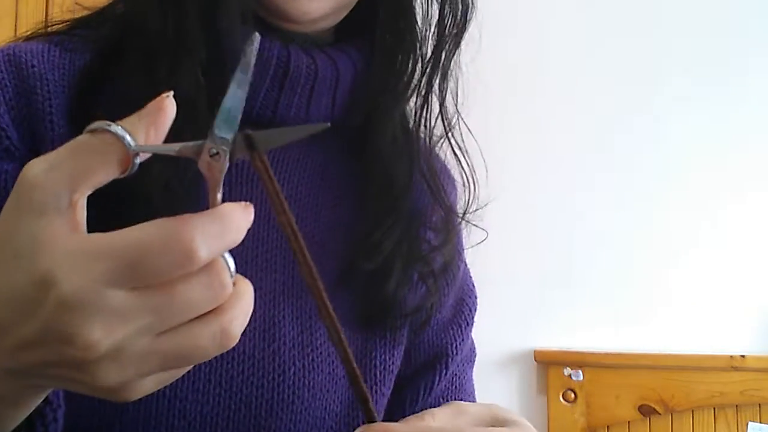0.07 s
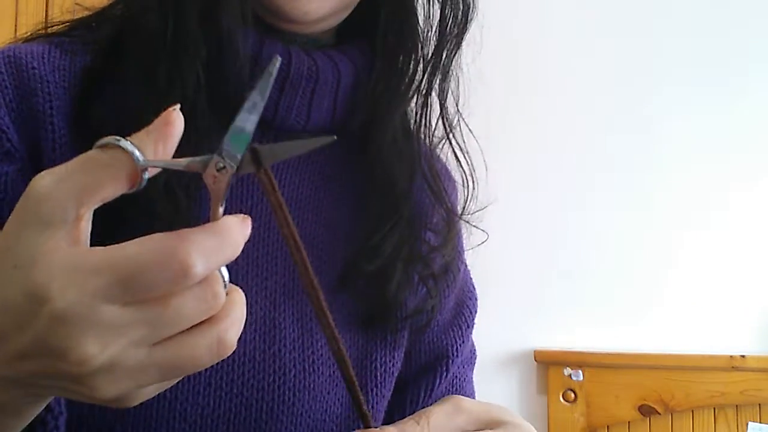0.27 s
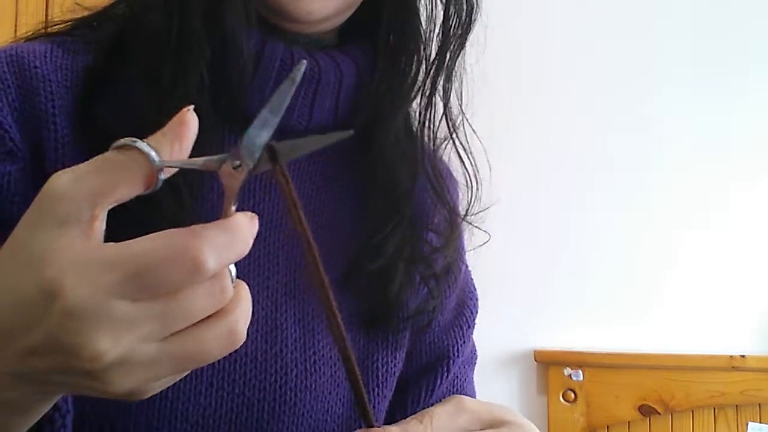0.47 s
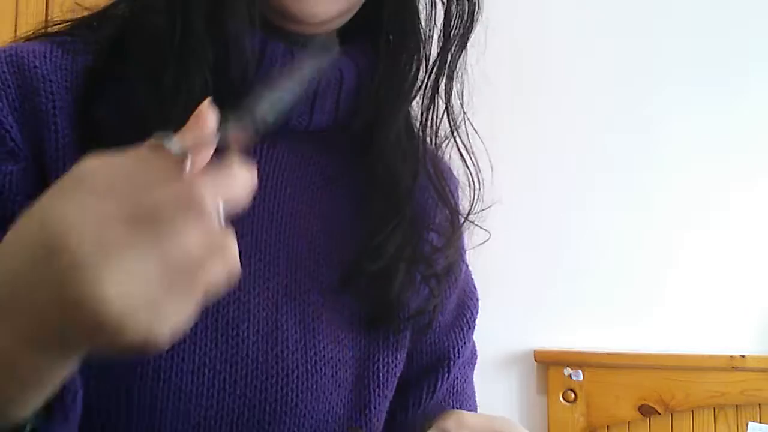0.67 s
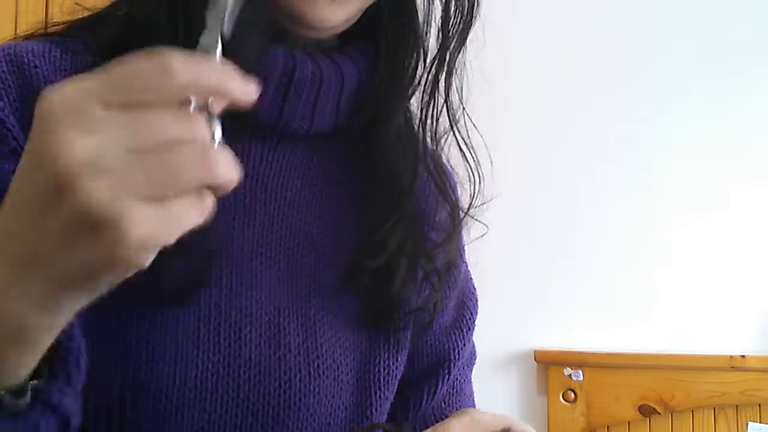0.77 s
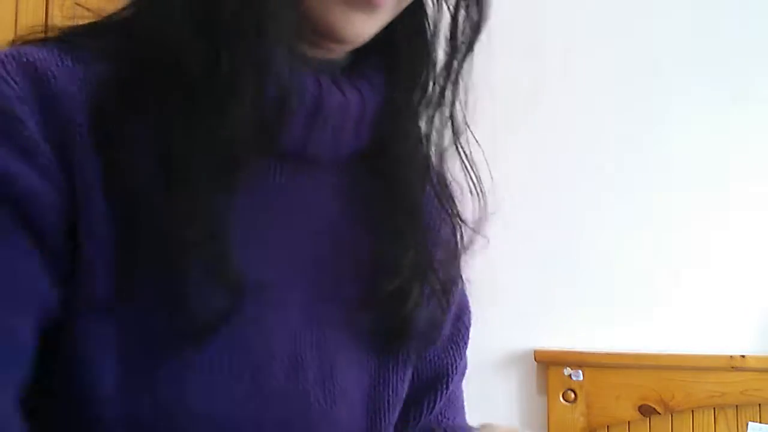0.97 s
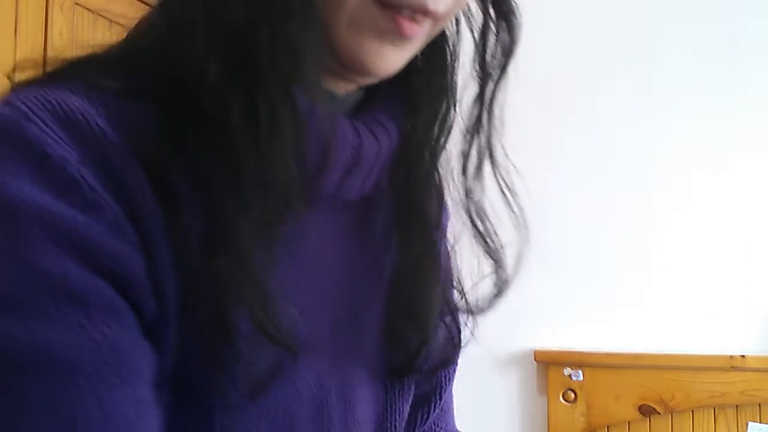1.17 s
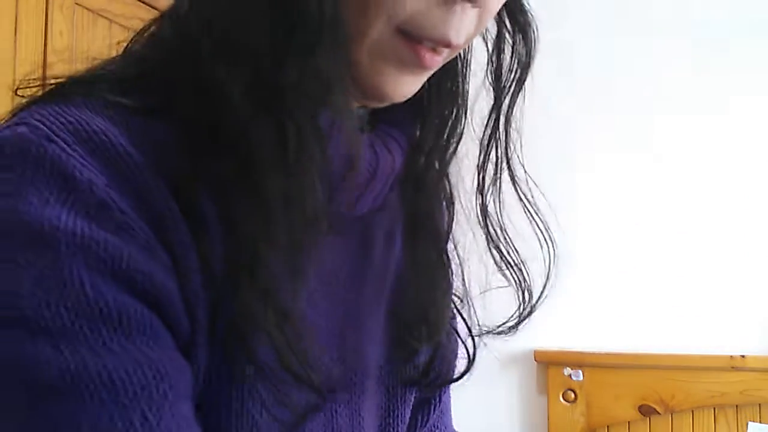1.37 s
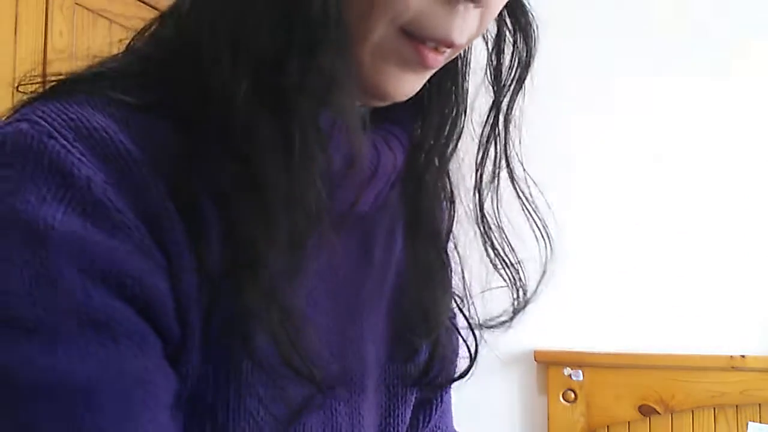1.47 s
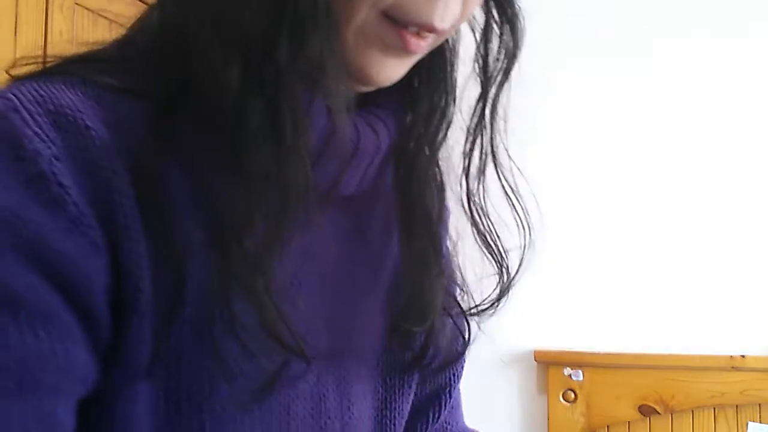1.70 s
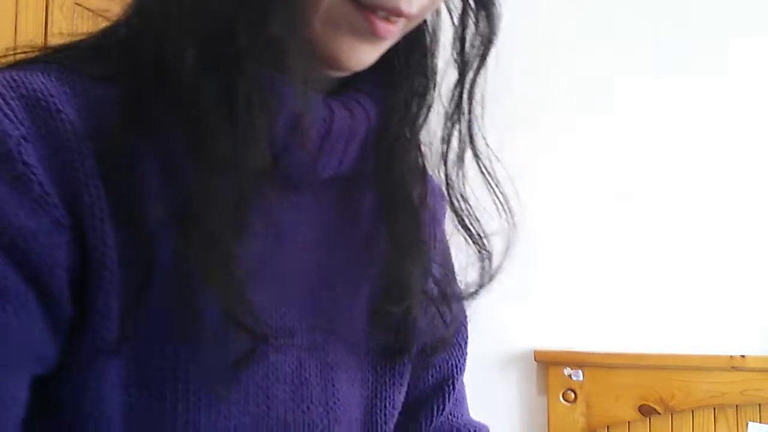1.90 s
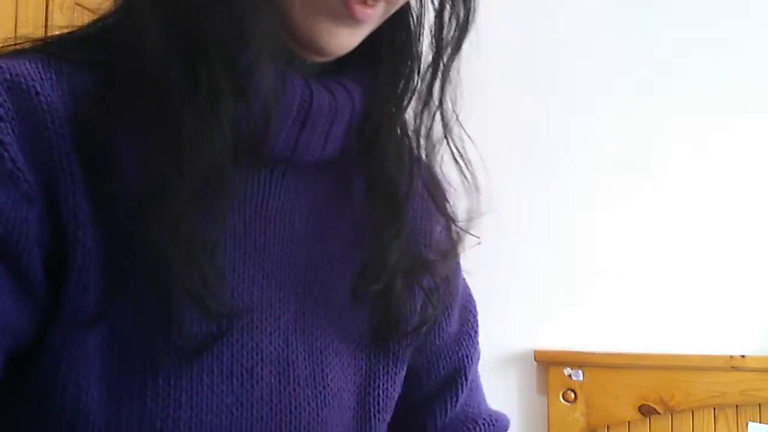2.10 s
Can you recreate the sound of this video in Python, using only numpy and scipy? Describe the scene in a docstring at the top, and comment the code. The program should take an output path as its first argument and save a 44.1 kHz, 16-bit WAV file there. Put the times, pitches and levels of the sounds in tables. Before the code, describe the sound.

Small steel scissors cut yarn close to the microphone: faint blade rubs and light metal ticks, one sharper click, then a loud crisp snip with a short bright ring, in a quiet small room with soft hiss.

```python
"""Small steel scissors cut a strand of yarn close to the microphone in a quiet room.
Over a low rumble and a steady hiss, the blades first rub faintly (swells of grainy noise bands) and
tick as they are handled (short noise bursts with a room tail), with one sharper click among the ticks.
Then they snap through the yarn (coloured noise crack); 6.5 ms later the handles clack together
(grainy rattle) and the steel rings briefly (decaying sines). Soft low bumps come before and after."""
import sys
import numpy as np
from scipy.fft import rfft, irfft, next_fast_len
from scipy.io import wavfile
from scipy.ndimage import map_coordinates

SR = 44100
rng = np.random.default_rng(int(sys.argv[2]) if len(sys.argv) > 2 else 0)


def output_pcm(signal):
    """Save a mono or channel-first signal as 16-bit PCM at the path in sys.argv[1].

    Samples are clipped to [-1, 1] before scaling.
    """
    pcm = np.clip(np.atleast_2d(signal).T, -1, 1) * 32767
    wavfile.write(sys.argv[1], SR, np.round(pcm).astype(np.int16))


N = 94682
TIME = np.arange(N) / SR
SNAP_S, CLACK_S = 1.4396, 1.4461  # the blades snap, then the handles clack
ROOM_T60_S, ROOM_RISE_S = 0.18, 0.0032  # the room's answer to ticks and click; the clack shares the rise


def amp(db):
    """Decibels to gain."""
    return 10 ** (np.asarray(db) / 20)


def unit(x):
    """Scale to rms 1."""
    return x / np.sqrt(np.mean(x ** 2) + 1e-20)


def filtered(x, gain):
    """Multiply the spectrum of x by a gain that depends on frequency."""
    padded = next_fast_len(N + SR // 4)
    hz = np.fft.rfftfreq(padded, 1 / SR)
    return irfft(rfft(x, padded) * gain(hz), padded)[:N]


def noise(points):
    """Noise of rms 1 whose spectrum follows (frequency [Hz], relative level [dB]) points."""
    point_hz, point_db = np.transpose(points)

    def colour(hz):
        return amp(np.interp(np.log(hz + 1), np.log(point_hz + 1), point_db))

    return unit(filtered(rng.standard_normal(N), colour))


def band(centre_hz, octaves):
    """Noise of rms 1 in one hump with steep skirts; about 4 dB down at octaves from its centre."""
    def hump(hz):
        distance = np.log2((hz + 1) / centre_hz) / octaves
        return (1 + 0.26 * distance ** 2) ** -2.0

    return unit(filtered(rng.standard_normal(N), hump))


def wobble(rate):
    """A smooth random curve, rate knots a second."""
    return map_coordinates(rng.standard_normal(N // 8), [TIME * rate], mode="wrap")


def grainy(x, depth_db, grains_per_s):
    """Roughen x with fast random level changes, then scale to rms 1."""
    return unit(x * amp(depth_db * wobble(grains_per_s)))


def strike(start, t60, rise=1e-4):
    """Envelope of a blow: a quick rise and an exponential decay."""
    t = np.maximum(TIME - start, 0)
    return (1 - np.exp(-t / rise)) * amp(-60 * t / t60)


def swell(middle, half):
    """Bell-shaped envelope around its middle; half is the standard deviation (s)."""
    return np.exp(-.5 * ((TIME - middle) / half) ** 2)


def background():
    """Low room rumble, swaying slightly in level, under an even hiss."""
    # Room colours: (frequency [Hz], relative level [dB per Hz])
    rumble_colour = [(20, -46), (32, -28), (45, -8.5), (60, -4.5), (80, -9), (100, -3), (125, 0), (160, -8),
                     (215, -10), (290, -11), (420, -21), (600, -25), (1000, -44)]
    hiss_colour = [(350, -22), (600, 0.5), (625, -1), (875, -2), (1650, -9), (2860, -6), (3500, -9),
                   (5840, -6.5), (6420, -10.5), (14000, -14), (15000, -16)]
    rumble_db, sway_db, sway_per_s = -61.5, .5, 12.04
    rumble = amp(rumble_db + sway_db * wobble(sway_per_s)) * noise(rumble_colour)
    hiss = amp(-69.5) * noise(hiss_colour)
    return rumble + hiss


def bumps():
    """Soft low swells of narrow noise that barely rise over the rumble."""
    # Bumps: (middle [s], half length [s], level [dB], centre [Hz], width [octaves])
    bump_list = [(0.776, .05, -62, 101, .5), (1.556, 0.019, -55.5, 135, 0.31), (1.87, .025, -61, 75.4, .5),
                 (1.894, .012, -62, 280, 0.1)]
    out = np.zeros(N)
    for middle, half, db, hz, octaves in bump_list:
        out += amp(db) * swell(middle, half) * band(hz, octaves)
    return out


def rubs():
    """Faint swells of grainy noise as the blades slide on each other."""
    # Rubs: (middle [s], half length [s], level [dB], centre [Hz], width [octaves])
    rub_list = [(0.286, 0.015, -70.5, 5500, .35), (0.651, 0.015, -68, 4070, 0.17),
                (.655, 0.013, -69, 10400, .08), (.65, .018, -68, 8000, 1), (1.01, 0.037, -73.5, 5500, .5),
                (1.413, 0.0096, -67.5, 1500, 0.9)]
    for_depth_db, grains_per_s = 2.5, 620
    out = np.zeros(N)
    for middle, half, db, hz, octaves in rub_list:
        scrape = grainy(band(hz, octaves), for_depth_db, grains_per_s)
        out += amp(db) * swell(middle, half) * scrape
    return out


def ticks():
    """Light contacts of the metal: short noise bursts, each answered by the room."""
    # Ticks: (time [s], level [dB], centre [Hz], width [octaves], t60 [s], room level re tick [dB])
    tick_list = [(.657, -56, 7500, 1.0, 0.013, -16), (.7545, -60, 9000, 0.23, 0.016, -13),
                 (.7918, -52, 5600, .8, .02, -14), (1.0416, -42.5, 5140, 0.4, 0.0049, -26)]
    out = np.zeros(N)
    for start, db, hz, octaves, t60, room_db in tick_list:
        direct = strike(start, t60) * band(hz, octaves)
        room = amp(room_db) * strike(start, ROOM_T60_S, ROOM_RISE_S) * band(hz, octaves)
        out += amp(db) * (direct + room)
    return out


def click():
    """The open blades knock together: a sharper burst of bright noise, answered by the room."""
    # Click colour: (frequency [Hz], relative level [dB per Hz])
    click_colour = [(800, -22), (1800, -15), (2700, -7), (3100, -10.5), (3500, -10), (4200, -11),
                    (5000, -4), (5800, -0.5), (6700, -7), (7400, 2.5), (8000, -0.5), (9200, 3.5),
                    (9900, -9), (10600, -1), (11500, -8), (12100, -2), (13200, -10), (14200, 1),
                    (15000, -16)]
    start, level_db, t60_s, room_db = .7822, -35.5, 0.0089, -18.5  # room level re click
    direct = strike(start, t60_s) * noise(click_colour)
    room = amp(room_db) * strike(start, ROOM_T60_S, ROOM_RISE_S) * noise(click_colour)
    return amp(level_db) * (direct + room)


def thud():
    """A soft low thump of noise that starts with the snap."""
    # Thud colour: (frequency [Hz], relative level [dB per Hz])
    thud_colour = [(40, -30), (130, 3), (200, -9.5), (400, -18.5), (900, -45)]
    return amp(-46) * strike(SNAP_S, t60=0.36, rise=0.0046) * noise(thud_colour)


def steel_ring():
    """The steel's modes ring as slightly unsteady sines, and die faster after a hold."""
    # Modes of the steel: (frequency [Hz], level [dB], rise [s], t60 [s],
    # offset of a paired tone [Hz], its relative amplitude [0-1]); an offset pair beats
    steel_modes = [(563, -53, 0.00202, 0.16, 0, 0), (769, -48, .002, .16, 0, 0),
                   (1201, -41, 0.00098, 0.13, 0, 0), (1380, -37, .001, 0.13, 0, 0),
                   (3444, -37, 0.0055, 0.41, 0, 0.03), (3900, -39, .002, 0.17, 0, 0.04),
                   (5220, -32.5, .002, 0.13, 0, 0), (5362, -39.5, .002, 0.16, 0, 0),
                   (5470, -42, .002, 0.19, 0, 0), (5600, -40, .002, 0.17, 0, 0.03),
                   (6377, -35, 0.0011, 0.46, 12, 0.77), (7125, -18, 0.024, 0.24, 0, 0),
                   (8080, -40, .001, 0.12, 0, 0), (8468, -47, .003, 0.23, 0, 0),
                   (9836, -32, 0.0094, 0.29, 0, 0.14), (10280, -30.5, 0.0099, 0.35, 0, 0.12),
                   (11900, -37, .002, .15, 0, 0), (13950, -31, .0004, 0.23, 0, 0.02)]
    waver_rad, waver_per_s = 0.2, 130
    hold_s, choke_db_per_s, choke_db = 0.097, 293, 19.5
    since_clack = TIME - CLACK_S
    turn = 2 * np.pi * since_clack
    ring = np.zeros(N)
    for hz, db, rise, t60, beat, depth in steel_modes:
        phase = hz * turn + rng.uniform(0, 2 * np.pi) + waver_rad * wobble(waver_per_s)
        pair = np.sin(phase) + depth * np.sin(phase + beat * turn)
        ring += amp(db) * strike(CLACK_S, t60, rise) * np.sqrt(2) * pair  # sqrt(2): a lone sine has rms 1
    choke = amp(-np.clip((since_clack - hold_s) * choke_db_per_s, 0, choke_db))
    return ring * choke


def clack():
    """The handles meet: a dense grainy rattle and the room's answer, both decaying noise."""
    # Rattle and room colours: (frequency [Hz], relative level [dB per Hz])
    clack_colour = [(200, -17.5), (400, -37), (570, -10.5), (670, -17), (770, -6), (920, -35), (1150, -8.5),
                    (1370, -1.5), (1550, -9.5), (1900, -11.5), (2300, -27.5), (3100, -14), (3900, -2),
                    (4700, -9), (5400, 2.5), (6000, -10), (8300, -11), (9300, -16.5), (10300, -5),
                    (11200, -20), (12300, -9.5), (13900, -7), (15000, -26)]
    tail_colour = [(200, -11), (600, -5), (1400, 0), (2400, -9.5), (3800, -4), (5400, -1.5), (8000, -7),
                   (11000, -16), (14000, -9), (15000, -22)]
    grains = grainy(noise(clack_colour), depth_db=1.5, grains_per_s=700)
    rattle = amp(-27.5) * strike(CLACK_S, t60=.16) * grains
    room = amp(-46) * strike(CLACK_S, t60=0.39, rise=ROOM_RISE_S) * noise(tail_colour)
    return rattle + room


def snap():
    """The yarn gives way: a short noise crack with a weak, longer tail."""
    # Snap colour: (frequency [Hz], relative level [dB per Hz])
    snap_colour = [(200, -23), (700, -15.5), (1290, -6.5), (2060, -16.5), (2800, -8), (3940, 5),
                   (4500, -1.5), (5600, 4), (6420, 2.5), (6800, -3.5), (7970, 4), (9300, -8.5),
                   (11200, -16), (13000, -10), (15000, -23)]
    crack = amp(-16.5) * strike(SNAP_S, t60=0.012) * noise(snap_colour)
    tail = amp(-29.5) * strike(SNAP_S, t60=0.16) * noise(snap_colour)
    return crack + tail


def scene():
    """Scissors and room at one microphone."""
    room = background() + bumps()
    handling = rubs() + ticks() + click()
    cut = thud() + steel_ring() + clack() + snap()
    return (room + handling + cut)[None]


def record(dry):
    """The recorder falls off steeply above its band limit."""
    top_hz = 14650
    return filtered(dry[0], lambda hz: 1 / np.sqrt(1 + (hz / top_hz) ** 200))[None]


dry = scene()
out = record(dry)
output_pcm(out)
```